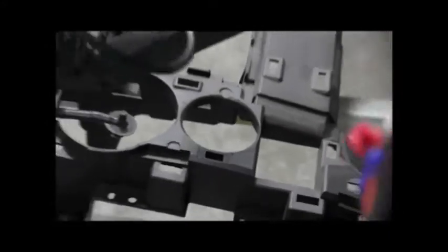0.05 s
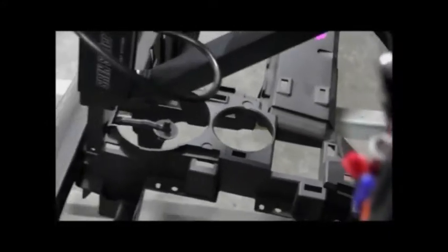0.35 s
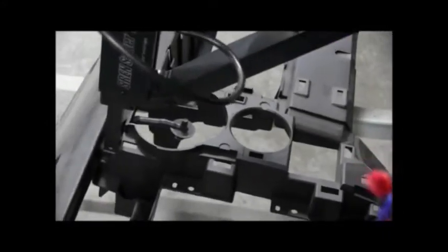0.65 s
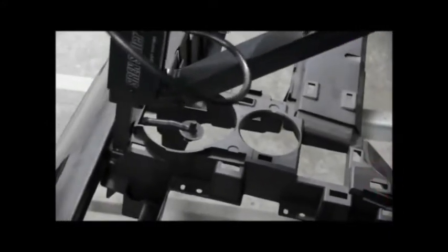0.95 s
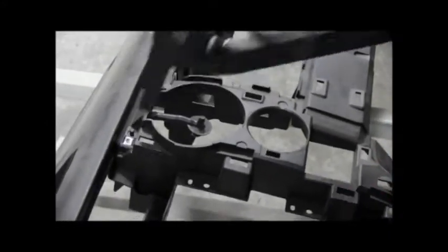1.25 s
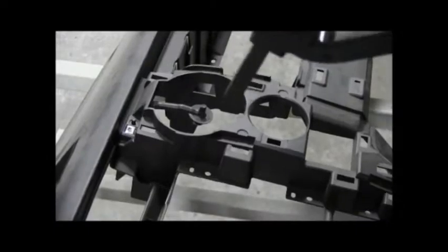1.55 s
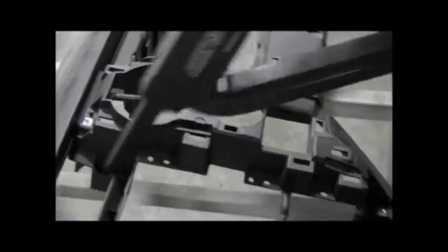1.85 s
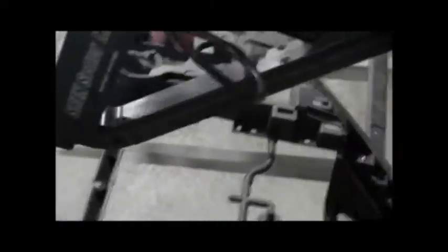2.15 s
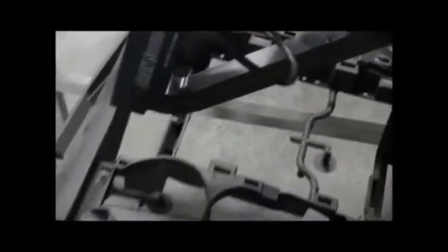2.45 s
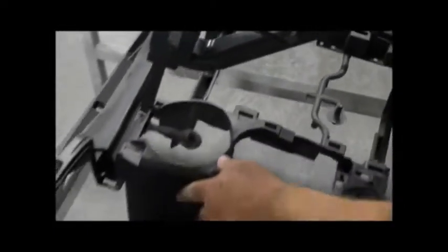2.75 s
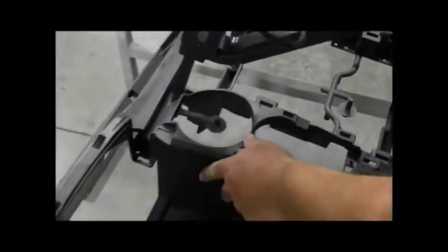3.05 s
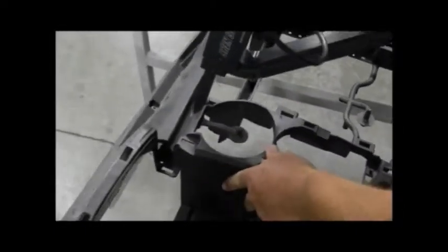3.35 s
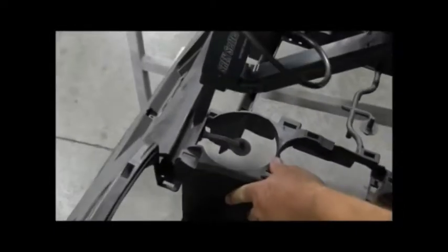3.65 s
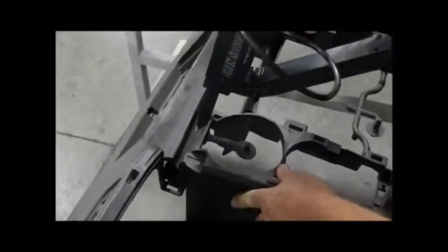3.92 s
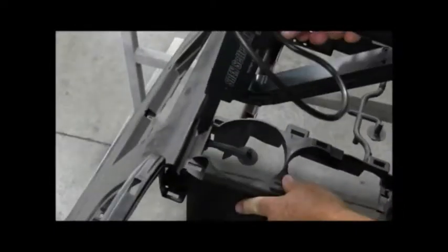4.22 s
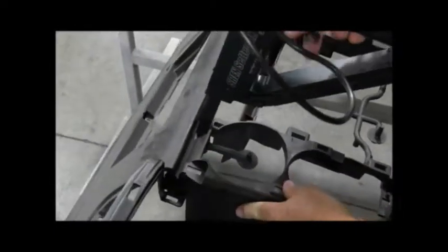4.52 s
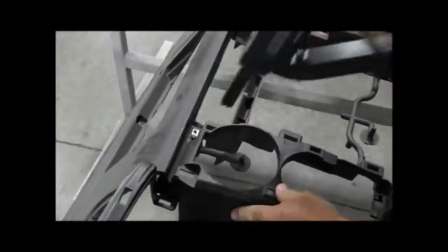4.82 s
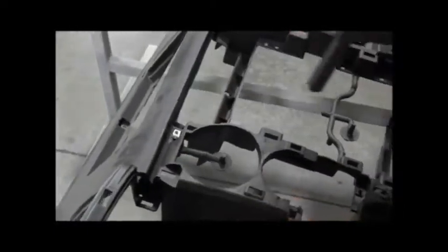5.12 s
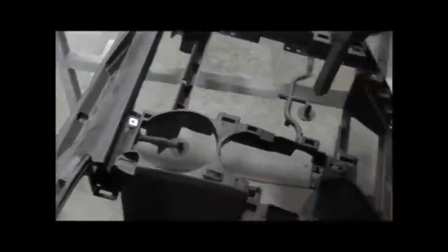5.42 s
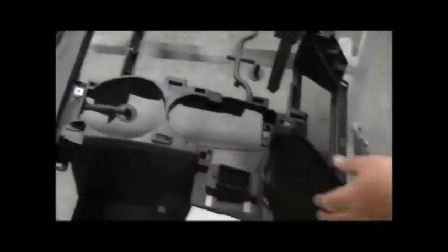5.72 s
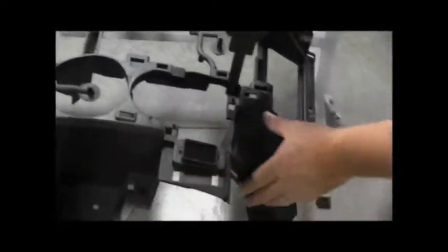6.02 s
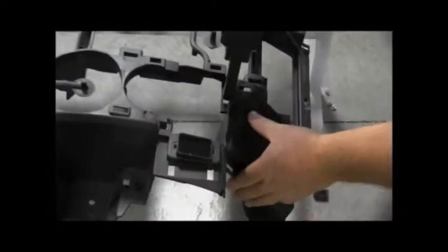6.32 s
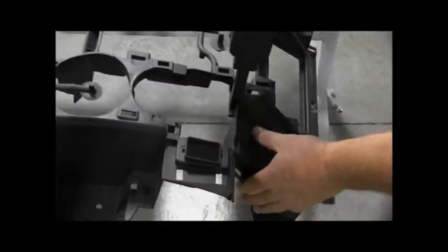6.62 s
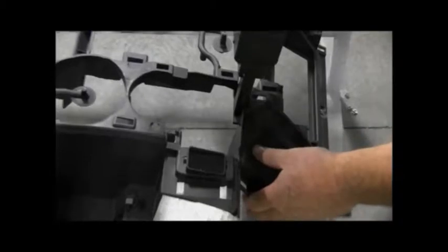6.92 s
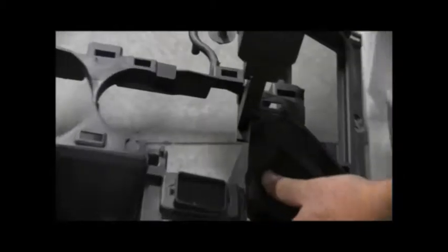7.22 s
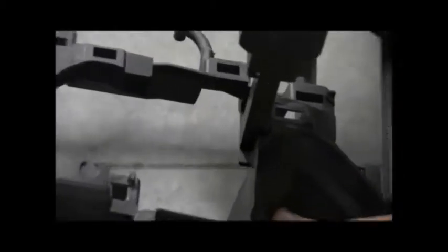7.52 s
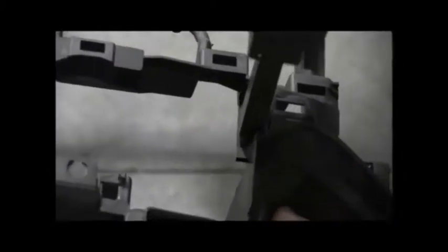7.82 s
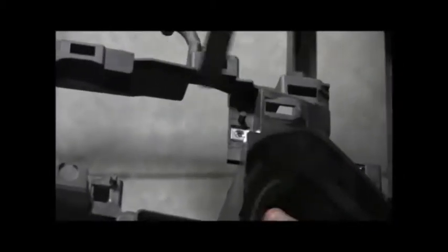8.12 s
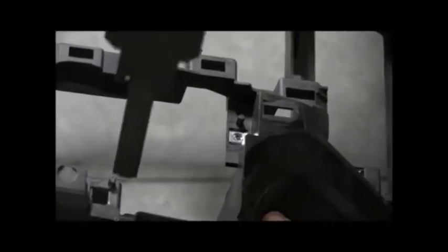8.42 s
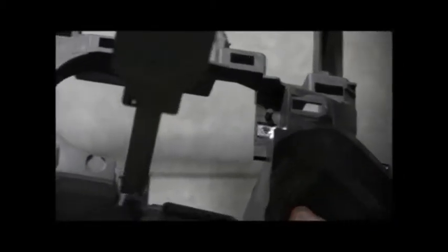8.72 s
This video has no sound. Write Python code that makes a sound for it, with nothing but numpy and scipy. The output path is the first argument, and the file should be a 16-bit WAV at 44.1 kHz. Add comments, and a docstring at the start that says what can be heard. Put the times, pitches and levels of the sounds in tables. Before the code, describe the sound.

Three sharp clacks from an air-powered clip gun, with small clicks and knocks, cut through hissing compressed air and humming machines.

```python
"""Three sharp cracks of a pneumatic clip setter cut through the hiss of leaking air in a factory.
Each shot: the nose bumps a plastic panel, air spits, the steel driver strikes, the clip snaps in
and the piston thuds home. Every contact is a set of ringing modes plus a crack of noise.
The leak is shaped noise, over hall rumble, a blower and humming motors. The limiter of a
hand-held camera close by ducks it all after the loud blows."""
import sys
import numpy as np
from scipy import signal
from scipy.fft import rfft, irfft, next_fast_len
from scipy.io import wavfile
from scipy.ndimage import uniform_filter1d, minimum_filter1d

SR = 44100
rng = np.random.default_rng(int(sys.argv[2]) if len(sys.argv) > 2 else 0)


def transcribe(signal):
    """Save signal, clipped to [-1, 1], as a 16-bit WAV file at the path in sys.argv[1]."""
    frames = np.atleast_2d(signal).T
    limited = np.clip(frames, -1, 1)
    pcm = np.round(limited * 32767).astype(np.int16)
    wavfile.write(sys.argv[1], SR, pcm)


N = 395136

# how much of the air leak reaches the camera as the work moves: t/s, level/dB
LEAK_LEVEL = [(0.0, -20), (1.07, -23.5), (1.63, -24), (1.81, -27.5), (2.37, -25.5), (2.46, -27.5),
              (3.3, -25), (4.9, -25.5), (4.99, -27.5), (5.64, -28.5), (5.83, -23), (6.48, -22),
              (6.85, -24.5), (8.01, -24.5), (8.29, -22.5), (8.96, -21.5)]
# the driver fires: t/s, peak/dB, favoured f/Hz
DRIVER_STRIKES = [(0.531, 5.5, 2460), (4.1117, -0.5, 2400), (7.3398, 10.5, 3100)]


def amp(db):
    return 10 ** (np.asarray(db) / 20)


def unit(x):
    return x / np.sqrt(np.mean(x ** 2) + 1e-20)


def along(points, hz):
    """Interpolate (f/Hz, value) points on a log axis."""
    f, v = np.transpose(points)
    return np.interp(np.log(hz + 1), np.log(f + 1), v)


def fader(points):
    """A level in dB for every sample, from (t/s, level/dB) points."""
    return np.interp(np.arange(N) / SR, *np.transpose(points))


def swing(points):
    """A fader's travel in dB about its own mean."""
    db = fader(points)
    return db - db.mean()


def wobble(rate):
    """A smooth random curve, rate knots a second."""
    knots = rng.standard_normal(int(N * rate / SR) + 4)
    smooth = signal.resample_poly(knots, 10, 1)
    return np.interp(np.arange(N) * rate / SR, np.arange(len(smooth)) / 10, smooth)


def filtered(x, response):
    """Equalise x with a gain that is a function of frequency."""
    size = next_fast_len(N + 8192)
    return irfft(rfft(x, size) * response(np.fft.rfftfreq(size, 1 / SR)), size)[..., :N]


def noise(spectrum):
    """Stereo noise of rms 1 with the given spectral shape."""
    # stereo width of the noise: f/Hz, side over mid/dB
    width = [(30, -20), (70, -14), (150, -15.5), (400, -16), (750, -12.5), (1300, -43.5), (2600, -8),
             (5000, -20.5), (9000, -12.5), (14000, -38.5)]
    response = lambda hz: amp(along(spectrum, hz) + np.outer([0, 1], along(width, hz)))
    mid, side = filtered(rng.standard_normal((2, N)), response)
    return unit(np.array([mid + side, mid - side]))


def add(track, s, sound):
    """Mix a sound into a track at time s."""
    part = track[round(s * SR):][:len(sound)]
    part += sound[:len(part)]


def leak():
    """Escaping air: rush, hiss, jet and whistles ride one fader; ring and fizz swell on their own."""
    # bands of the leak, from the broad rush up to the fizz on top: f/Hz, density/dB
    rush_band = [(450, -36), (600, -8), (1000, -3), (1550, -5), (2150, -4), (2550, -2.5), (2900, -2),
                 (3400, -3), (3950, -3.5), (4600, -1.5), (5300, -6.5), (6000, -6.5), (7000, -7),
                 (9000, -40)]
    whistle_band = [(2200, -32), (2450, 7), (2562, 11), (2660, -10), (2900, -41)]
    high_whistle_band = [(3050, -35), (3330, 4), (3480, 2), (3630, -6), (3950, -35)]
    ring_band = [(4300, -21), (4750, -3.5), (5300, -0.5), (5750, -5.5), (6400, -37)]
    hiss_band = [(5400, -51), (6200, -12.5), (7000, -3.5), (7800, -0.5), (8700, 0), (9400, -6),
                 (10500, -49)]
    jet_band = [(8200, -30), (9300, -7.5), (10400, -4), (11200, -6.5), (11900, -10), (12800, -31)]
    fizz_band = [(10800, -45), (11900, -5.5), (12900, -.7), (13900, -2.6), (14700, -.7), (15900, 0),
                 (16300, -60)]
    # what the hall gives back of the rush: f/Hz, gain/dB
    hall_return = [(700, 1), (1050, 1.5), (2000, -2), (4200, -0.5), (5200, -25)]
    # swells of the treble and of the ring near 5 kHz: t/s, level/dB
    treble_level = [(0.0, -23), (1.07, -24.8), (2.37, -20), (2.74, -24), (3.3, -22), (4.71, -25),
                    (4.81, -22), (5.18, -18), (5.36, -22.5), (5.55, -24), (5.64, -23.5), (6.11, -20.8),
                    (6.66, -20.5), (8.96, -23.5)]
    ring_level = [(0.0, -37.5), (2.74, -32.5), (3.11, -30), (4.99, -35.5), (5.55, -27.5), (5.74, -31),
                  (6.01, -25.3), (6.94, -31), (8.1, -28.5), (8.2, -24.5), (8.96, -26)]
    near_db, sparkle_db = swing(LEAK_LEVEL), 0.48 * swing(treble_level)
    rush = amp(-25 + near_db) * noise(rush_band)
    hall_colour = lambda hz: amp(along(rush_band, hz) + along(hall_return, hz))
    diffuse = amp(-31.5) * unit(filtered(rng.standard_normal((2, N)), hall_colour))
    hiss = amp(-25 + 0.37 * near_db + sparkle_db) * noise(hiss_band)
    jet = amp(-25 + 0.32 * near_db + sparkle_db) * noise(jet_band)
    whistles = amp(-40 + 1.6 * near_db + 3 * wobble(2.55)) * noise(whistle_band)
    whistles += amp(-41.5 + near_db + 3 * wobble(1.92)) * noise(high_whistle_band)
    ring = amp(-4 + fader(ring_level).mean() + 1.6 * swing(ring_level)) * noise(ring_band)
    fizz = amp(fader(treble_level)) * noise(fizz_band)
    lean_right = amp([[-.3], [.3]])
    return (rush + diffuse + hiss + jet + whistles + ring) * lean_right + fizz


def swell(hz, t, s, half_s, centre_hz, octaves):
    """A bell in pitch and time, top 1."""
    in_pitch = np.exp(-(np.log2((hz + 1) / centre_hz) / octaves) ** 2)
    in_time = np.exp(-((t - s) / half_s) ** 2)
    return np.outer(in_pitch, in_time)


def shifting_air(patchy_db):
    """The leak changes colour in patches as the camera moves, and brightens where the jet sweeps by."""
    # the jet's narrow beam crosses the microphone: t/s, half length/s, boost/dB, f/Hz, half width/octaves
    sweeps = [(1.75, .2, 5, 9800, .08), (5.085, 0.32, 5.5, 10400, 0.23)]
    hz, t, spectra = signal.stft(leak(), SR, nperseg=512)
    patches = uniform_filter1d(rng.standard_normal(spectra.shape[1:]), size=3, axis=0)
    patches = uniform_filter1d(patches, size=80, axis=1)
    # the hiss dulls just after the second sweep peaks
    shade_db = -7.5 * swell(hz, t, s=5.23, half_s=0.15, centre_hz=7840, octaves=0.29)
    colour_db = patchy_db * unit(patches) + shade_db
    for s, half_s, db, centre_hz, octaves in sweeps:
        colour_db += db * swell(hz, t, s, half_s, centre_hz, octaves)
    flutter = amp(0.27 * wobble(25))
    return flutter * signal.istft(spectra * amp(colour_db), nperseg=512)[1][:, :N]


def drone(hz, db, ear_phase):
    """A slightly unsteady tone that reaches the two ears out of step."""
    phase = 2 * np.pi * hz * np.arange(N) / SR + 0.66 * wobble(2.966)
    waver_db = 1.5 * wobble(3)
    return np.sqrt(2) * amp(db + waver_db) * np.sin(phase + ear_phase * np.array([[1], [-1]]))


def machines():
    """Hall rumble, a blower's narrow roar, a motor's drone and hums that beat against each other."""
    # noise of the hall and of the blower: f/Hz, density/dB
    rumble_band = [(18, -18), (45, -20), (70, -15), (100, -2.5), (140, -4.5), (200, 1.5), (260, -4),
                   (370, -3), (450, -6), (560, -1), (900, -20), (2000, -52)]
    blower_band = [(430, -34), (510, -11), (600, -10), (700, -2), (750, -2), (785, 3), (820, -9),
                   (860, -14), (1100, -52)]
    # mains and machine tones: f/Hz, level/dB
    hum_tones = [(111.7, -53.5), (119.9, -44.5), (167.3, -50), (334.5, -49), (562, -52), (569.3, -46),
                 (575, -52.5)]
    # swells of the blower and of the motor: t/s, level/dB
    blower_level = [(0.0, -39), (1.44, -34), (1.9, -31), (2.0, -34), (2.28, -30), (2.74, -35), (4.81, -31),
                    (5.46, -41.5), (5.83, -30), (8.96, -28.5)]
    motor_level = [(0.0, -52), (1.53, -43), (2.0, -52.4), (2.55, -43), (3.3, -65), (5.83, -41), (7.73, -54),
                   (7.83, -48), (8.29, -46), (8.96, -44.9)]
    hall_db = 1.12 * swing(LEAK_LEVEL)  # rumble and hum rise and fall with the leak
    rumble = amp(-36.5 + hall_db) * noise(rumble_band)
    hum = sum(drone(hz, db + hall_db, ear_phase=0.037) for hz, db in hum_tones)
    lean_right = amp([[-1.1], [1.1]])
    blower = amp(fader(blower_level) - 0.5) * noise(blower_band) * lean_right
    motor = drone(hz=56.2, db=fader(motor_level) - 0.5, ear_phase=.09)
    return rumble + blower + motor + hum


def blow(modes, crack_db, crack_t60, attack_s, focus_hz, focus_db):
    """One impact: decaying modes, a little different each time, plus a crack of contact noise; peak 1."""
    t = np.arange(SR // 5) / SR
    hz, db, t60 = np.transpose(modes)[:, :, None]
    strength, detune, phase = rng.standard_normal((3, len(modes), 1))
    decay = amp(db + 0.43 * strength - 60 * t / t60)
    ring = decay * np.sin(2 * np.pi * (hz * (1 + 0.013 * detune) * t + phase))
    crack = amp(crack_db - 60 * t / crack_t60) * rng.standard_normal(len(t))
    # the place of contact favours the modes around one pitch
    octaves = np.log2((np.fft.rfftfreq(len(t), 1 / SR) + 1) / focus_hz)
    focus = amp(focus_db * np.exp(-(octaves / 0.49) ** 2))
    sound = irfft(rfft(ring.sum(0) + crack) * focus, len(t))
    sound *= (1 - np.exp(-t / attack_s)) * (1 - t / t[-1])
    return sound / np.abs(sound).max()


def panel_knock(hz):
    """A soft blow on the plastic panel."""
    # modes of the panel: f/Hz, level/dB, t60/s
    modes = [(179, 3, 0.031), (262, 0, 0.032), (361, 2, 0.058), (650, -3, .035), (980, -4.5, 0.037),
             (1350, -2.5, 0.056)]
    return blow(modes, crack_db=-16, crack_t60=0.025, attack_s=0.0006, focus_hz=hz, focus_db=14)


def spring_tick(hz):
    """A small spring part clicks."""
    modes = [(hz * 0.66, -4, .05), (hz, 0, .04), (hz * 1.1, -4, .05)]  # f/Hz, level/dB, t60/s
    return blow(modes, crack_db=4, crack_t60=0.03, attack_s=0.0004, focus_hz=hz, focus_db=8)


def valve_spit(length_s):
    """Air spits from the valve, swelling up to each strike and stopping there."""
    # noise of the valve: f/Hz, density/dB
    spit_band = [(1500, -25), (3300, 4), (4600, 4), (6000, -10), (8000, 6), (12000, -41)]
    t = np.arange(N) / SR
    flow = sum(np.clip(1 - (s - t) / length_s, 0, 1) * (t < s) for s, _, _ in DRIVER_STRIKES)
    return amp(-23) * np.sqrt(flow) * noise(spit_band)


def steel_hit(hz, ring_db):
    """Steel on steel chatters: a second contact follows at once."""
    # modes of the steel driver: f/Hz, level/dB, t60/s
    modes = [(800, -34, 0.033), (1406, -14, 0.069), (1650, -19, 0.038), (2135, -0.5, 0.02),
             (2580, -12.5, 0.093), (3020, -1.5, 0.024), (3400, -5.5, 0.04), (4170, 0.5, 0.022),
             (5000, -4, 0.03), (6550, -6, 0.02), (7670, 4.5, 0.016), (9080, 5.5, 0.0092),
             (10400, -1, 0.015)]
    sound = np.zeros(SR // 5)
    for delay_s, db in [(0, -1), (.0014, -4)]:
        contact = blow(modes, crack_db=3, crack_t60=0.038, attack_s=.0001, focus_hz=hz, focus_db=ring_db)
        add(sound, delay_s, amp(db) * contact)
    return sound


def piston_thud():
    """The piston comes home and rebounds twice from its rubber stop."""
    # modes of the gun's body: f/Hz, level/dB, t60/s
    modes = [(302, -11, 0.11), (413, -11, 0.091), (540, -14, 0.11), (593, 0, 0.053), (798, -3, 0.055),
             (1040, 0, 0.023), (1243, -1.5, 0.027), (1430, -7, 0.019), (1843, 3.5, 0.021), (2180, 1, 0.012),
             (3060, -6, .02)]
    sound = np.zeros(SR // 5)
    for delay_s, db in [(0, 0), (.0024, -2), (.0052, -7)]:
        contact = blow(modes, crack_db=-5, crack_t60=.035, attack_s=.0004, focus_hz=1100, focus_db=3)
        add(sound, delay_s, amp(db) * contact)
    return sound


def clip_setter():
    # contacts around each shot: t/s, peak/dB, favoured f/Hz
    presses = [(.355, -13, 297), (3.92, -15.5, 260), (7.164, -11.5, 277)]  # the nose is pressed onto the panel
    knocks = [(0.402, -10.5, 1000), (.443, -16, 1000), (0.466, -20, 250), (0.921, -18, 1000),
              (4.477, -32, 350), (7.186, -20, 800), (7.676, -21, 1310)]  # hand and gun knock on the panel
    ticks = [(.484, -9, 8500), (.979, -1, 10500), (4.05, -7, 8240), (4.228, -7, 7640), (4.491, -10, 7800),
             (7.468, -5, 7700), (7.785, -3, 8600)]  # trigger and clip feed
    snaps = [(.5954, 9, 8050), (4.161, 7.5, 8400), (7.4012, 5, 3500)]  # the clip snaps into its seat
    clinks = [(0.6635, -3, 1300), (4.471, -6, 1800)]  # the steel nose comes free
    # the piston comes home: t/s, peak/dB
    thuds = [(.742, 2), (4.247, -2), (7.4823, -1.5)]
    latches = [(s + 0.0036, db + 8, 8100) for s, db, _ in presses]  # the safety latch ticks
    settles = [(s + 0.00703, db - 6.5, hz) for s, db, hz in presses]  # the nose bumps again
    touches = [(s - .0052, db - 17, 3920) for s, db, _ in snaps]
    answers = [(s + 0.00746, db - 9.5, 300) for s, db in thuds]  # the panel answers the piston
    track = np.zeros(N)
    for s, db, hz in presses + settles + knocks + answers:
        add(track, s, amp(db) * panel_knock(hz))
    for s, db, hz in DRIVER_STRIKES:
        add(track, s, amp(db) * steel_hit(hz, ring_db=11))
    for s, db, hz in touches + snaps + clinks:
        add(track, s, amp(db) * steel_hit(hz, ring_db=5))
    for s, db in thuds:
        add(track, s, amp(db) * piston_thud())
    for s, db, hz in latches + ticks:
        add(track, s, amp(db) * spring_tick(hz))
    return track


def reflections(x, t60, wet_db):
    """Scattered echoes, different at each ear."""
    t = np.arange(SR // 2) / SR
    tail = rng.standard_normal((2, len(t))) * amp(-60 * t / t60) * (1 - np.exp(-t / 0.0013))
    return amp(wet_db) * signal.fftconvolve(x[None], tail / np.linalg.norm(tail[0]), axes=1)[:, :N]


def limiter(x, ceiling_db, hold_s, release_s):
    """Peaks pull the gain down at once; it waits, then creeps back."""
    level = np.abs(uniform_filter1d(np.abs(x).max(0), size=12))
    over_db = np.maximum(20 * np.log10(level + 1e-9) - ceiling_db, 1e-9)
    window = 2 * int(hold_s * SR / 2) + 1
    held_db = -minimum_filter1d(-over_db, size=window, origin=window // 2)
    fall = np.arange(N) / SR / release_s
    cut_db = np.exp(np.maximum.accumulate(np.log(held_db) + fall) - fall)  # exponential release
    gain = minimum_filter1d(amp(-cut_db), size=33)
    return x * uniform_filter1d(gain, size=33)


def scene():
    """The gun with near echoes from its steel jig and a short hall tail, over the factory bed."""
    shots = clip_setter()
    jig = reflections(shots, t60=0.055, wet_db=-16.5)
    hall = reflections(shots, t60=.25, wet_db=-11)
    return shots + jig + hall + valve_spit(length_s=0.036) + shifting_air(patchy_db=1.5) + machines()


def record(dry):
    """The camera ducks after loud blows, rounds off what slips through and cuts the very top."""
    full_scale, top_hz = .72, 15800
    limited = limiter(dry, ceiling_db=-8.5, hold_s=0.032, release_s=0.06)
    rounded = limited / (1 + np.abs(limited / full_scale) ** 8) ** (1 / 8)
    return filtered(rounded, lambda hz: hz < top_hz)


dry = scene()
out = record(dry)
transcribe(out)
```